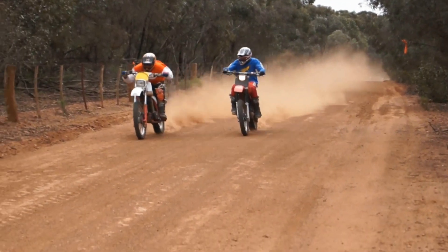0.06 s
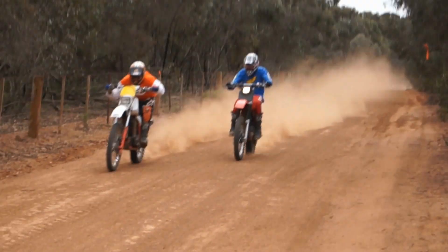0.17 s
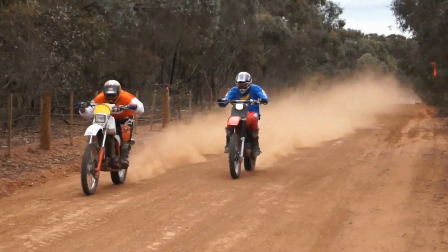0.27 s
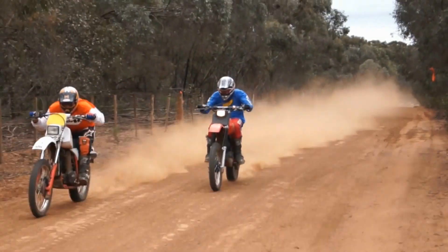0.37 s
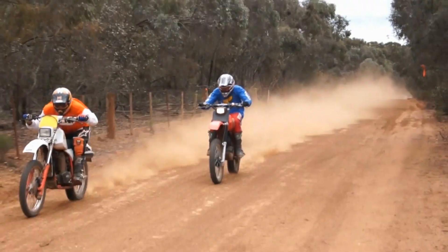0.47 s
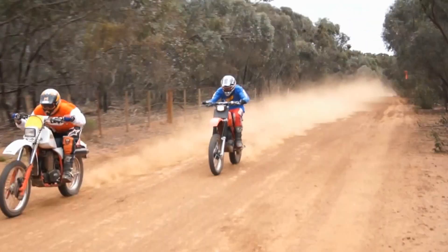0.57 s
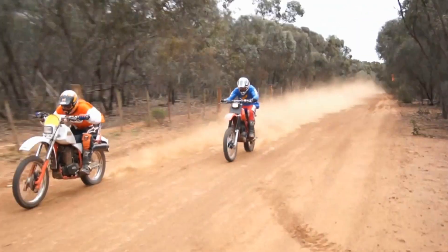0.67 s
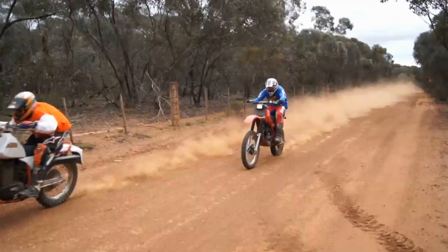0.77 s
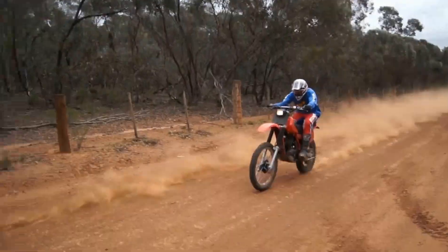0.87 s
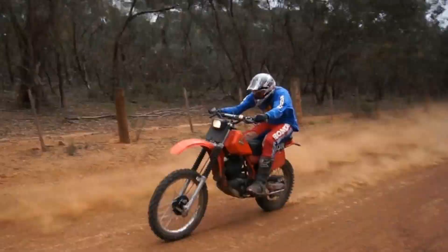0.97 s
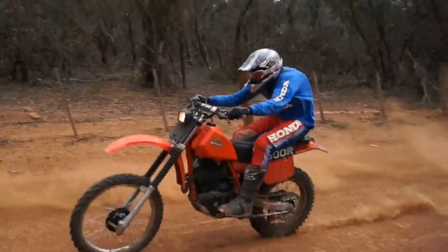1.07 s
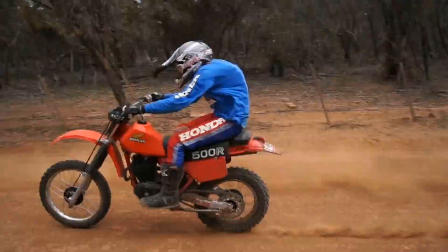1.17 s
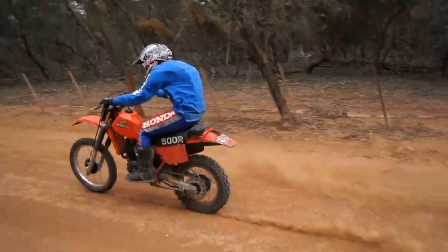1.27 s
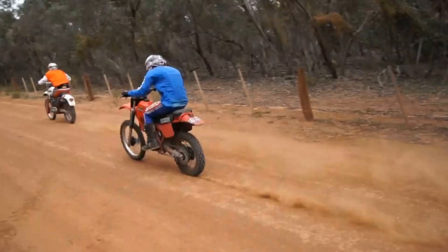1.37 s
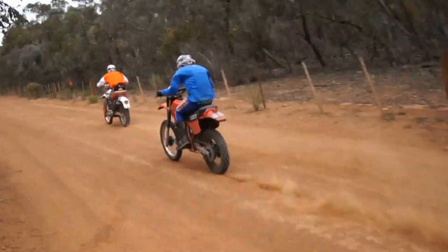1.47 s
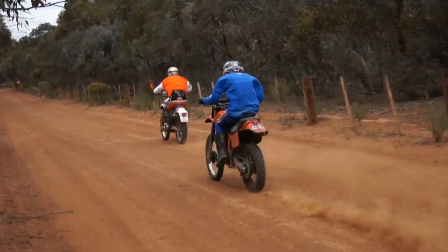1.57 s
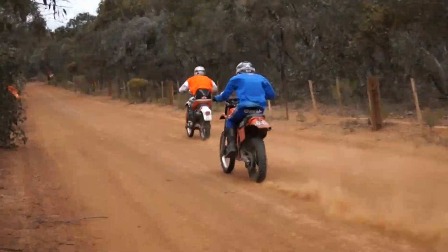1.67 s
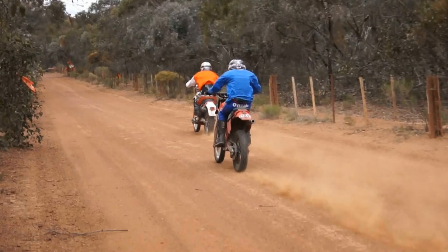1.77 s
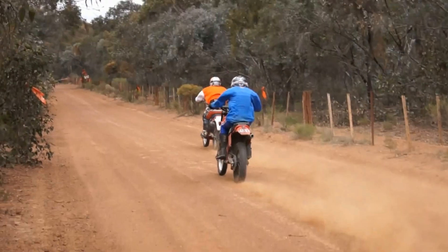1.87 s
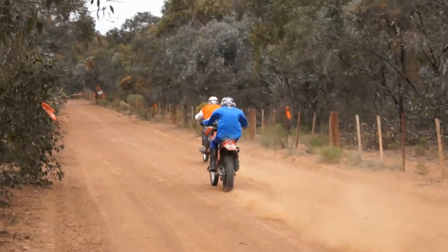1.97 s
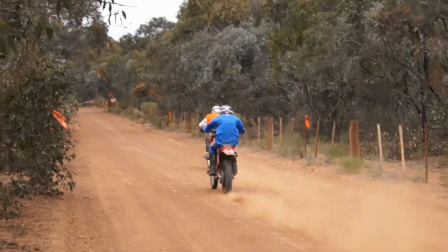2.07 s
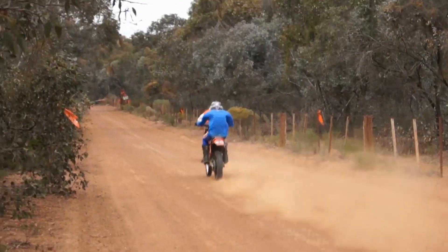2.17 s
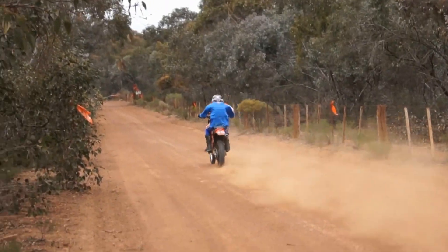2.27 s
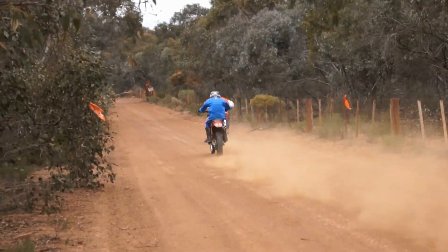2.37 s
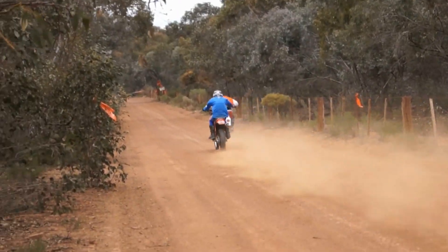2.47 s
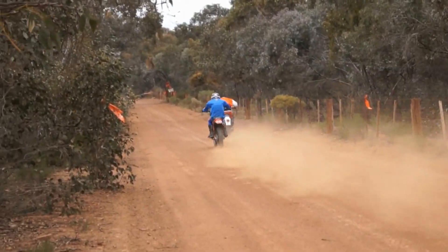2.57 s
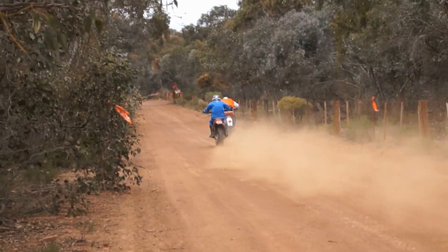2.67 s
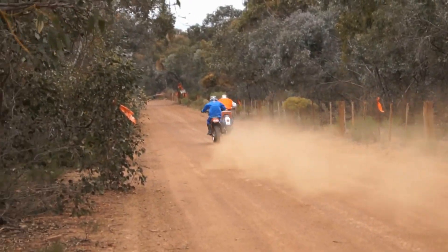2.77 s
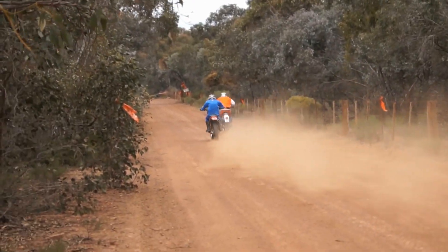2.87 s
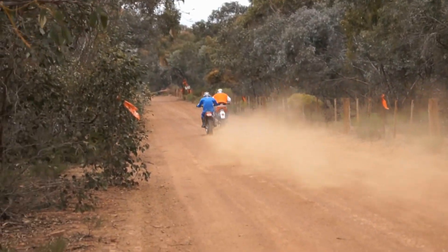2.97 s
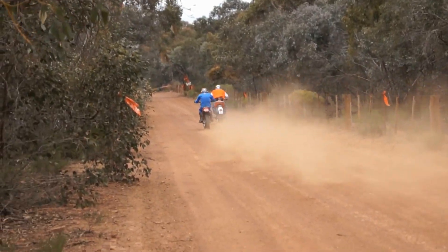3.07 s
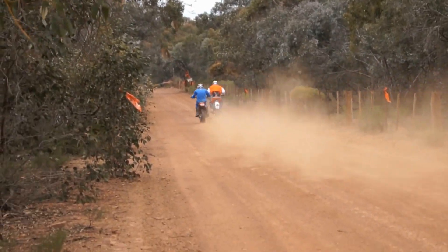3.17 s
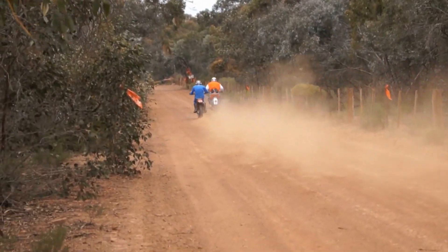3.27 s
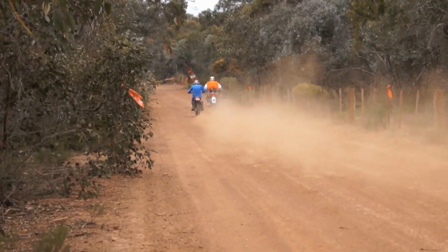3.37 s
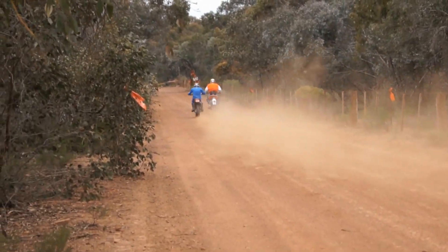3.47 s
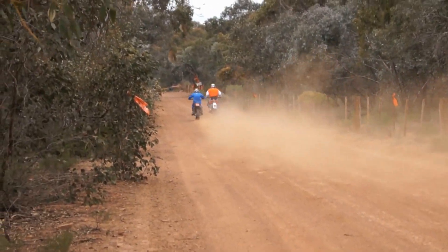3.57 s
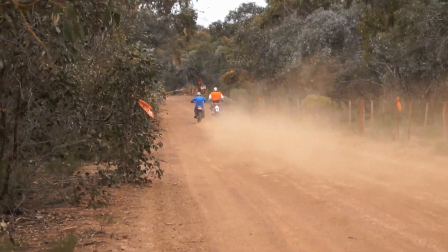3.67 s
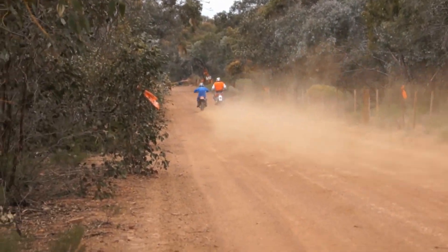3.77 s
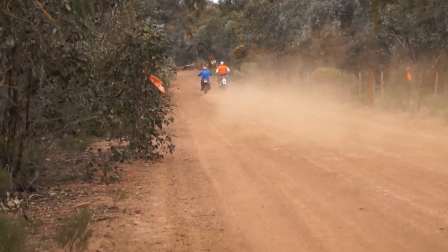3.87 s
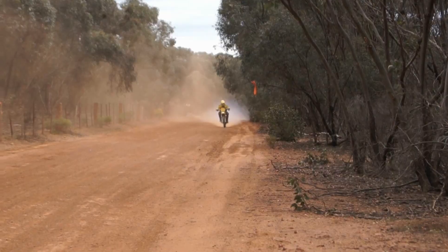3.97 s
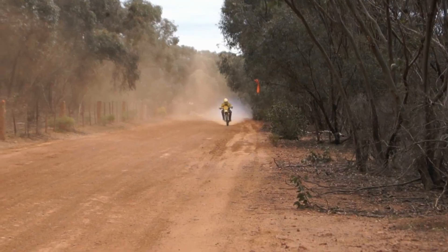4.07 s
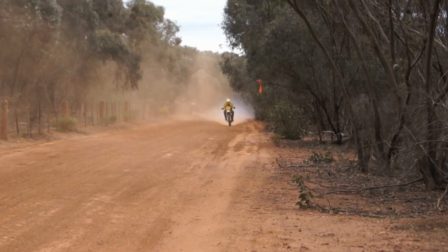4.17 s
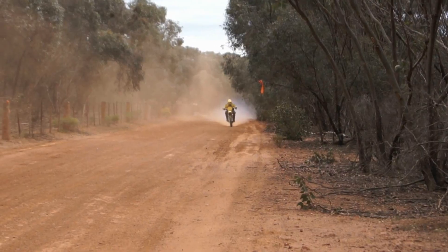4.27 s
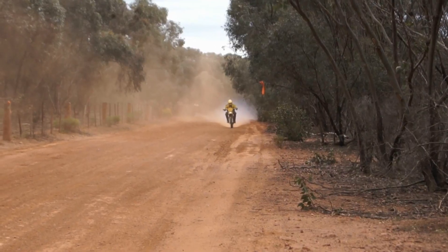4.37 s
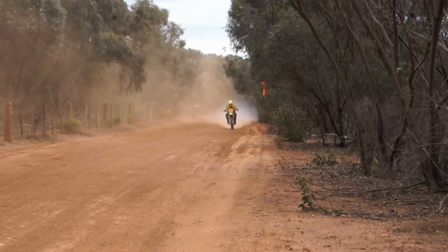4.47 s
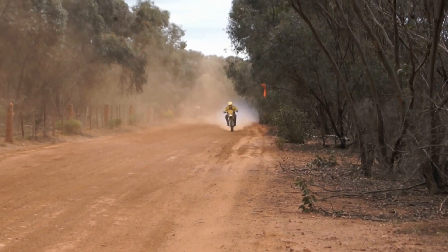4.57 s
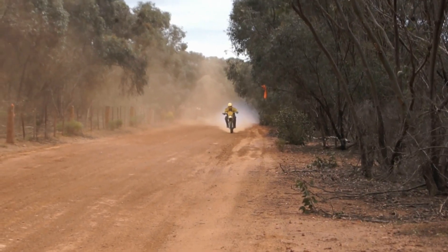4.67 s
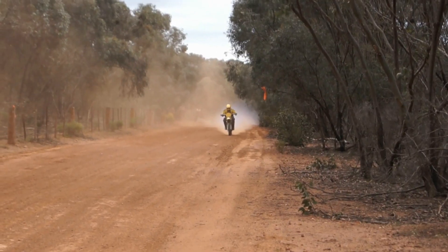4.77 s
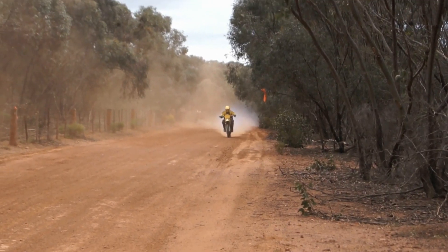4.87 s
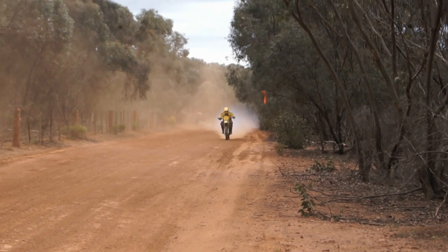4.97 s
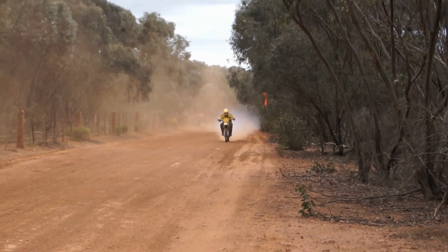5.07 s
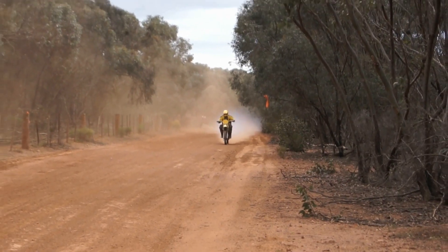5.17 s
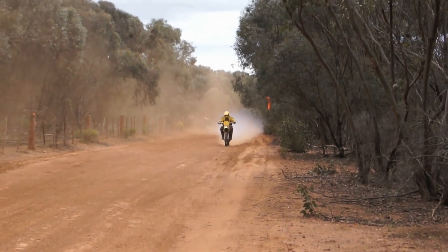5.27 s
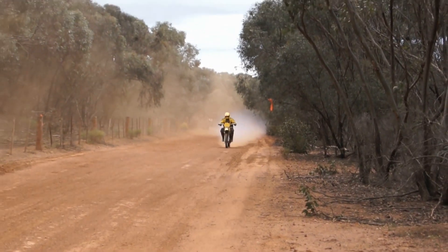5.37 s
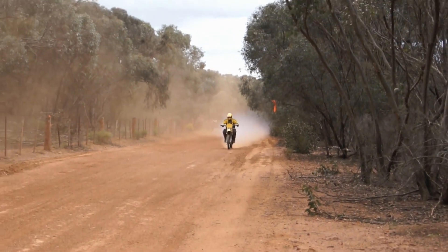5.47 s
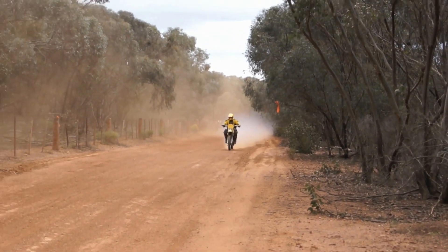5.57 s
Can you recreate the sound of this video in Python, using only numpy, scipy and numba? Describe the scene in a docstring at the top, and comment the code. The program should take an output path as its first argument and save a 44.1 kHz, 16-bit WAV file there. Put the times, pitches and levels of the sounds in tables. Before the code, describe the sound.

Outdoors on a tree-lined dirt road, two motorbikes are already close and loud, a thudding big single and a quicker buzzing one. They sweep past around one second with clattering chains and flung grit, the single changing gear, then easing off and receding. Faint stone ticks, a short dropout to silence, then a third bike comes on at high revs, its note sagging repeatedly. Roadside stereo microphone, slightly right-weighted.

```python
"""A big four-stroke motorbike thumps past on a dirt road, changes gear, rolls off the throttle and rides off between
trees, with a faster, buzzing bike just ahead of it. After a short silence a third bike comes up the road at high revs,
bogging down in ruts. Each firing is a pulse that makes resonances of the exhaust pipe ring, with a noisy jet of gas.
Shaped noise makes chains clatter, tyres hiss, grit fly and stones tick; a short, fading noise tail makes trees echo."""
import sys
import numpy as np
from scipy import signal
from scipy.fft import rfft, irfft, next_fast_len
from scipy.io import wavfile
from scipy.ndimage import uniform_filter1d
from numba import njit

SR = 44100
rng = np.random.default_rng(int(sys.argv[2]) if len(sys.argv) > 2 else 0)


def unload_audio(sound):
    """Save the sound as a 16-bit wav file, at the path given as the first command line argument."""
    columns = np.transpose(np.atleast_2d(sound))
    # keep every value between -1 and 1, then stretch to whole-number steps
    steps = np.round(np.clip(columns, -1, 1) * 32767)
    wavfile.write(sys.argv[1], SR, steps.astype(np.int16))


N = 248283
TIME = np.arange(N) / SR

# Big single: how often it fires, dropping at each gear change: time_s, firing_rate_hz
THUMPER_RATE = [(0.0, 49.3), (0.1, 50.1), (0.24, 49.4), (0.28, 42), (0.36, 39.3), (0.41, 41.2),
                (0.55, 43.16), (0.7, 43.4), (0.86, 45.12), (1.05, 45.19), (1.2, 45.35), (1.3, 44.89),
                (1.4, 42.99), (1.55, 42.64), (1.72, 42.88), (1.85, 43.21), (1.92, 39.5), (2.0, 42.08),
                (2.1, 43.71), (2.22, 43.61), (2.35, 44.72), (2.57, 44.57), (2.64, 38.6), (2.74, 38.75),
                (2.85, 39.28), (3.0, 39.14), (3.2, 38.39), (3.42, 37.28), (3.5, 35.15), (3.58, 35.47),
                (3.66, 33.73), (3.88, 33.35), (4.0, 32.8)]
# Big single: each twist of the throttle: opens_s, shuts_s, opening_time_s, throttle_0_to_1, boom_db,
# boom_slope_db_per_s, opening_surge_db, bark_over_boom_db, gas_over_boom_db
PULLS = [(-.03, 0.24, 0.024, 0.94, -23, -8.5, 1, 0.5, 6.5),
         (.34, 1.875, 0.036, 0.83, -28.5, 1.5, 5, 0.5, 3.5),
         (1.952, 2.595, 0.055, 0.81, -30, 0, 8.5, 0, 2.5),
         (2.79, 4.4, 0.14, 0.04, -26, -9, -4.5, -2, -10.5)]
# Big single: low pipe resonances under load: pitch_hz, width_hz, level_db
BOOM = [(164, 16, -4), (213, 34, 6), (262, 90, -5), (513, 61, -1.5)]
# Big single: low pipe resonances off throttle: pitch_hz, width_hz, level_db
COAST = [(184, 24, -3.5), (272, 60, 3), (331.4, 34, 0), (468, 60, -1.5)]
# Big single: silencer shell, ringing when it coasts: pitch_hz, width_hz, level_db
SHELL = [(1749, 130, -15), (1860, 120, -1)]
# Big single: a pipe resonance that sweeps down as it goes by: time_s, pitch_hz, level_db
GROWL = [(.5, 510, 10.5), (1.15, 485, 1), (1.27, 456, 10.5), (1.38, 399.8, 12.5), (1.52, 356, 0),
         (1.7, 330, 4.5), (2.05, 291, 3), (2.5, 290, -1.5)]
# Big single: two barking resonances that shift as it goes by:
# time_s, lower_pitch_hz, lower_level_db, upper_pitch_hz, upper_level_db
BARK = [(0, 737, 5, 950, -16.5), (.5, 700, 7, 1010, -3.5), (.7, 720, 3.5, 957.5, -0.5),
        (.88, 794, 0, 950, -2.5), (1.06, 830.4, -1.5, 931, 4), (1.19, 767, 7.5, 910, 2),
        (1.29, 770, -2, 974, 5), (1.4, 754, -4, 1020, 3), (1.58, 808.5, 3.5, 980, -3),
        (1.72, 760, 2, 960, 3), (1.83, 751, -11.5, 910, 5), (2.0, 699.3, 4, 940, -5),
        (2.5, 714, 5.5, 810.3, -3), (3.0, 688, 2, 849, -4.5), (3.9, 659, 0.5, 782, -8.5)]
# Big single: tone colour of the gas jet: pitch_hz, level_db
GAS = [(700, -21.5), (1200, -0.5), (1900, 1.5), (3000, 0.5), (4300, -4), (7000, -15.5), (10000, -22),
       (15000, -37)]
# Leading bike: revs and loudness: time_s, firing_rate_hz, level_db
LEADER = [(0, 56.96, -20.5), (.33, 58.16, -20), (.55, 59.1, -21.5), (.75, 59.9, -24), (.9, 60.1, -25.5),
          (1.02, 59.56, -29.5), (1.2, 55.54, -31), (1.85, 54.78, -29), (2.2, 56.8, -37.5),
          (2.6, 53.85, -51.5), (3.5, 50.2, -47)]
# Leading bike: lower pipe resonances: pitch_hz, width_hz, level_db
LEADER_LOW = [(165, 27, -24.5), (241.4, 18, 1), (289.4, 35, -2), (360.5, 16, 0.5), (526, 62, 3),
              (743, 104, 0)]
# Leading bike: upper pipe resonances, before the tuning below: pitch_hz, width_hz, level_db
LEADER_HIGH = [(793, 100, -9.5), (947, 110, 0), (1050, 110, 0)]
# Leading bike: what the upper pitches are multiplied by: time_s, pitch_ratio
LEADER_TUNING = [(0, 0.81), (.75, 0.87), (.92, 1), (1.06, 0.91), (1.25, 0.78)]
# Third bike: ruts that load the back wheel and pull the revs down: time_s, sag_hz, spread_s
RUTS = [(4.341, 5.1, 0.057), (4.483, 6.5, 0.035), (4.639, 4.8, 0.054), (4.81, 5.55, 0.028),
        (4.917, 3.08, 0.0286), (5.003, 3.8, 0.027), (5.106, 2.69, 0.0216), (5.212, 2.48, 0.028),
        (5.31, 1.63, 0.027)]
# Third bike: lower pipe resonances: pitch_hz, width_hz, level_db
THIRD_LOW = [(158, 22, -13), (206, 16, -21), (288, 75, -5.5), (381, 70, -4.5), (490, 20, -9), (505, 69, 7)]
# Third bike: upper pipe resonances: pitch_hz, width_hz, level_db
THIRD_HIGH = [(686, 38, 13.2), (730, 60, 9.5), (930, 96, 1)]
# Third bike: ringing engine metal: pitch_hz, half_width_of_each_filter_hz, level_db, growth_db_per_s
THIRD_METAL = [(1900, 170, 0, 0), (2780, 110, -11, 0), (3770, 90, -2, 2.5), (3980, 160, -6, 1.5),
               (5420, 120, -9, 2.5)]
# Third bike: tone colour of the tyre hiss: pitch_hz, level_db
THIRD_HISS = [(30, -24), (70, -5.5), (100, -15.5), (170, 0), (400, 3.5), (700, 4.5), (1080, 6.5), (1400, 1),
              (3000, -0.5), (4700, -6.5), (6300, -13.5), (8000, -17.5), (10500, -38), (15000, -48)]
# Tone colour of the chains and engine metal: pitch_hz, level_db
CLATTER = [(30, -25.5), (90, -26.5), (200, 2.5), (400, -1.5), (600, 3.5), (1100, 1.5), (1500, -2.5),
           (2100, 2.5), (2600, 1), (3200, -3), (4100, -3), (5500, -11), (8000, -17), (11000, -27.5),
           (15000, -47.5)]
# Tone colour of the flying grit: pitch_hz, level_db
GRIT = [(1500, -21.5), (4000, 15.5), (7000, 6.5), (10000, -0.5), (14000, -6), (16000, -33.5)]
# Stones flung against metal far down the road: time_s, level_db
STONES = [(3.631, -46), (3.646, -48), (3.751, -46), (3.812, -39), (3.95, -47)]
# Balance, a little to the right: time_s, left_minus_right_db
LEFT_DB = [(0, -3.5), (1.1, -1), (2.2, -1.95), (3.2, -3)]
# Hollows in the microphone's response: pitch_hz, width_hz, depth_db
HOLLOWS = [(599.5, 33, -9.5), (1385, 600, -8.5), (2363, 657, -40), (3450, 790, -10.5)]
# The sound cuts out between the two passes: time_s, level_db
FADE = [(3.995, 0), (4.055, -75), (4.07, -100), (4.279, -85), (4.289, 0)]

# Big single: a weak third barking resonance rides above the upper one
BARK_WIDTH_HZ, OVERTONE_RATIO, OVERTONE_DB = 102, 1.246, -13.5
PIPE_ECHO_S, PIPE_ECHO = 0.0025, 0.26
COOL_ECHO_S, COOL_ECHO = 0.00283, 0.2  # off throttle the gas is cooler and the round trip longer
CHAMBER_HZ, CHAMBER_WIDTH_HZ = 225.3, 67  # the silencer holds this part of the boom back
RIM_HZ, RIM_WIDTH_HZ, RIM_DB = 1220, 140, -8.5  # the tailpipe's own resonance, heard from behind
GROWL_WIDTH_HZ = 70
# a resonance heard only from straight behind
DRONE_HZ, DRONE_WIDTH_HZ, DRONE_DB, DRONE_S, DRONE_RISE_S = 402, 56, 8, 1.85, 0.22
SHELL_DB = -12
CRACK_SPREAD = 1.5  # power that exaggerates the size differences between gas cracks
SHUT_S = 0.023  # the hand snaps the throttle shut
SURGE_S, SURGE_GAS_SHARE = 0.19, 0.66  # spread of the opening surge; the gas crack shares in it
IDLE_DB, IDLE_DB_PER_M, IDLE_BARK_DB, IDLE_GAS_DB = -31, 0.3, -2.5, -22  # with the throttle shut
BARK_AHEAD_DB, GAS_AHEAD_DB = 5, -7  # changes heard from the front
TURNS_AWAY_S, TURN_S = 1.23, .1  # the cracks come out once its tail shows
AIM_S, AIM_SPREAD_S, AIM_GAS_DB = 1.35, 0.16, 4  # its tailpipe sweeps past the listener

# Leading bike's upper resonances over its lower ones: base, change from the front, lift as it swings by
UPPER_DB, UPPER_AHEAD_DB, SWING_DB, SWING_S, SWING_SPREAD_S = 0.5, -8, 14.5, 0.97, 0.2
RASP_HZ, RASP_WIDTH_HZ, RASP_DB = 2120, 460, -6.5  # intake rasp, sent forwards; width of each of two filters

# Third bike: starting levels, and how fast they grow as it nears
SECOND_PASS_S = 4.06
THIRD_HZ, THIRD_DB, THIRD_DB_PER_S = 74.63, -22, 2
THIRD_UPPER_DB, THIRD_UPPER_DB_PER_S = -1.5, 2.5
BRIGHT_HZ, BRIGHT_WIDTH_HZ, BRIGHT_DB, BRIGHT_DB_PER_S = 1040, 220, -6, 8  # the bark brightens as it nears
WHINE_ORDER, WHINE_DB = 10, -1.5  # one harmonic of its firing sings out clean
FLURRY_S, FLURRY_SPREAD_S, FLURRY_HZ, FLURRY_DB = 4.745, .05, 3900, 5  # the metal rings out in one flurry
METAL_DB, HISS_DB = -23.5, -24.5
METAL_DB_PER_HZ, HISS_DB_PER_HZ = 1.15, 0.35  # rasp and hiss ease as the revs sag
THIRD_SHUTS_S, THIRD_SHUT_HZ, THIRD_SHUT_DB = 5.532, 5.73, -6.5  # its rider rolls off the throttle
THIRD_SLOWS_S, THIRD_SLOW_S = 5.55, 0.072  # and the revs run down
THIRD_TREES_DB = -10

# Chains and engine metal: level at the closest point, lift from the front, loss at each doubling of distance
CLATTER_DB, CLATTER_AHEAD_DB, CLATTER_DB_PER_DOUBLING = -27.5, 17, 5
GRIT_DB, CHAIN_DB, CLOSE_DB_PER_M = -33.5, -30.5, 1  # grit and the single's chain fade with distance
STONE_HZ, STONE_WIDTH_HZ, STONE_FALL_S = 4300, 3000, .002  # width of each of two filters

# The pair's ride along the road
SPEED_M_S, CLOSEST_M, LEADER_PASSES_S, THUMPER_PASSES_S = 11.74, 4.4, 0.92, 1.15
HIDDEN_S, HIDDEN_DB_PER_S = 3.39, 22.5  # the level sinks from here on
SCREEN_S, SCREEN_RISE_S, SCREEN_DB = 3.35, 0.27, -1  # the bushes block the direct path
SCREEN_GAS_DB, SCREEN_BARK_DB = -4.5, -0.5  # and take the cracks first
VERGE_ECHO_S, VERGE_DB = 0.00675, -18  # an echo off the verge gets round them
HEIGHTS_M2 = 2.3  # height of the engines times height of the listener
GROUND_SHARE, DULL_DB_PER_M = 0.13, 0.84
TREES_T60_S, TREES_DB, TREES_LOW_HZ = 0.6, -3.5, 590  # T60: time for the echo to fall by 60 dB
TOP_HZ = 15600


def thumper():
    """Each firing cracks out with a jet of gas, runs back down the pipe and makes it boom and bark."""
    hz, = curves(THUMPER_RATE)
    throttle, boom_db, bark_db, gas_db = effort()
    gas_db = gas_db + AIM_GAS_DB * swell(AIM_S, AIM_SPREAD_S)
    gas_db = gas_db + GAS_AHEAD_DB * (1 - ramp(TURNS_AWAY_S, TURN_S))
    screened = ramp(SCREEN_S, SCREEN_RISE_S)
    gas_db = gas_db + SCREEN_GAS_DB * screened
    bark_db = bark_db + SCREEN_BARK_DB * screened

    pulses, age, size = firings(hz, jitter_s=.00003, scatter_db=.5, limp_db=0)
    flow = unit(size ** CRACK_SPREAD * puff(age, rise_s=.0008, fall_s=.0028))
    jet = pair(side=0.73) * flow
    push = unit(pulses) + .15 * jet.mean(axis=0)
    hot_echo = PIPE_ECHO * throttle * delay(push, PIPE_ECHO_S)
    cool_echo = COOL_ECHO * (delay(push, COOL_ECHO_S) + delay(push, 2 * COOL_ECHO_S) / 2)
    push = push + hot_echo + (1 - throttle) * cool_echo

    growl_hz, growl_db = curves(GROWL)
    growl = undb(growl_db) * glide(push, growl_hz, float(GROWL_WIDTH_HZ))
    behind = ramp(DRONE_S, DRONE_RISE_S)
    drone = undb(DRONE_DB) * behind * band(push, DRONE_HZ, DRONE_WIDTH_HZ)
    driven = cut(ring(push, BOOM) + growl + drone, 205.5, "high", order=6)
    driven = unit(cut(driven, 480, "low"))
    driven = linger(driven, CHAMBER_HZ, CHAMBER_WIDTH_HZ)

    coasting = unit(cut(cut(ring(push, COAST), 161, "high", order=5), 600, "low"))
    shell = unit(cut(ring(push + .3 * jet, SHELL), 3200, "low", order=4))
    coasting = coasting + undb(SHELL_DB) * shell

    lower_hz, lower_db, upper_hz, upper_db = curves(BARK)
    modes = [(lower_hz, lower_db), (upper_hz, upper_db), (upper_hz * OVERTONE_RATIO, OVERTONE_DB)]
    bark = sum(undb(db) * glide(push, f, float(BARK_WIDTH_HZ)) for f, db in modes)
    bark = bark + undb(RIM_DB) * behind * throttle * band(push, RIM_HZ, RIM_WIDTH_HZ)
    bark = unit(cut(cut(bark, 520, "high"), 1350, "low"))

    gas = colour(jet + .3 * unit(pulses), GAS)
    boom = throttle * driven + (1 - throttle) * coasting
    return undb(boom_db) * (boom + undb(bark_db) * bark + undb(gas_db) * gas)


def effort():
    """The single idles between pulls; each pull eases in from its surge level, holds and shuts."""
    metres, ahead = road(THUMPER_PASSES_S)
    state = [0, IDLE_DB - IDLE_DB_PER_M * metres, IDLE_BARK_DB, IDLE_GAS_DB]
    for opens, shuts, open_s, throttle, db, slope_db, surge_db, bark_db, gas_db in PULLS:
        held = ramp(opens, open_s) * (1 - ramp(shuts, SHUT_S))
        surge = surge_db * swell(opens, SURGE_S)
        pull_boom_db = db + slope_db * (TIME - opens) + surge
        # gas is set relative to the boom, so take back the part of the surge it does not share
        pull_gas_db = gas_db - (1 - SURGE_GAS_SHARE) * surge
        pulling = [np.clip(throttle, 0, 1), pull_boom_db, bark_db, pull_gas_db]
        state = [old + held * (new - old) for old, new in zip(state, pulling)]
    throttle, boom_db, bark_db, gas_db = state
    return throttle, boom_db, bark_db + BARK_AHEAD_DB * ahead, gas_db


def leader():
    """A faster, rougher engine rings its pipe; the upper pipe resonances stand out as it swings by."""
    hz, db = curves(LEADER)
    _, ahead = road(LEADER_PASSES_S)
    upper_db = UPPER_DB + UPPER_AHEAD_DB * ahead + SWING_DB * swell(SWING_S, SWING_SPREAD_S)
    pulses, age, size = firings(hz, jitter_s=.00008, scatter_db=.9, limp_db=.7)
    jet = unit(pair(side=0.77) * size * puff(age, rise_s=0.0012, fall_s=0.0067))

    low = ring(unit(pulses) + .2 * jet, LEADER_LOW)
    low = unit(cut(cut(low, 143, "high", order=4), 700, "low"))

    tuning, = curves(LEADER_TUNING)
    push = unit(pulses) + .9 * jet
    high = 0
    for pitch_hz, width_hz, level_db in LEADER_HIGH:
        mode = np.array([glide(channel, pitch_hz * tuning, float(width_hz)) for channel in push])
        high = high + undb(level_db) * mode
    high = unit(cut(cut(high, 560, "high"), 1300, "low"))

    rasp = unit(band(band(jet, RASP_HZ, RASP_WIDTH_HZ), RASP_HZ, RASP_WIDTH_HZ))
    return undb(db) * (low + undb(upper_db) * high + undb(RASP_DB) * ahead * rasp)


def third_bike():
    """High revs ring a narrow-tuned pipe; the engine's metal sings in flurries over tyre hiss."""
    elapsed = np.maximum(TIME - SECOND_PASS_S, 0)
    shut = ramp(THIRD_SHUTS_S, SHUT_S)
    sag = sum(sag_hz * swell(s, spread) for s, sag_hz, spread in RUTS)
    sag = sag + THIRD_SHUT_HZ * ramp(THIRD_SLOWS_S, THIRD_SLOW_S)
    hz = THIRD_HZ - sag
    pulses, age, size = firings(hz, jitter_s=.00005, scatter_db=.75, limp_db=.7)
    jet = unit(pair(side=0.16) * size * puff(age, rise_s=0.0029, fall_s=0.021))

    low = ring(unit(pulses) + .15 * jet, THIRD_LOW)
    low = unit(cut(cut(low, 140, "high", order=4), 514, "low"))

    high = ring(unit(pulses) + .4 * jet, THIRD_HIGH)
    high = undb(-2.5) * unit(cut(cut(high, 430, "high"), 1380, "low"))
    whine = np.sin(2 * np.pi * WHINE_ORDER * np.cumsum(hz) / SR)
    high = high + undb(WHINE_DB) * (1 - shut) * whine
    bright_gain = undb(BRIGHT_DB + BRIGHT_DB_PER_S * elapsed)
    high = high + (bright_gain - 1) * band(high, BRIGHT_HZ, BRIGHT_WIDTH_HZ)

    knocks = rattle(side=0.63, grain_db=-1, grain_hz=306) + 0.13 * jet
    metal = 0
    for pitch_hz, half_width_hz, level_db, growth in THIRD_METAL:
        mode = band(band(knocks, pitch_hz, 2 * half_width_hz), pitch_hz, 2 * half_width_hz)
        metal = metal + undb(level_db + growth * elapsed + wander(16)) * mode
    flurry = swell(FLURRY_S, FLURRY_SPREAD_S)
    metal = metal + (undb(FLURRY_DB) - 1) * flurry * band(metal, FLURRY_HZ, 700)
    metal = cut(cut(unit(metal), 920, "high"), 5060, "low", order=4)

    hiss = colour(rattle(side=0.5, grain_db=1.5, grain_hz=496), THIRD_HISS)
    upper_gain = undb(THIRD_UPPER_DB + THIRD_UPPER_DB_PER_S * elapsed)
    pipe = undb(THIRD_DB + THIRD_SHUT_DB * shut) * (low + upper_gain * high)
    rasp = undb(METAL_DB - METAL_DB_PER_HZ * sag) * metal + undb(HISS_DB - HISS_DB_PER_HZ * sag) * hiss
    return undb(THIRD_DB_PER_S * elapsed) * (pipe + rasp)


def rolling():
    """Chains and engine metal clatter, mostly forwards; the tyres fling grit, loudest close by."""
    metres, ahead = road(LEADER_PASSES_S)
    doublings = np.log2(metres / CLOSEST_M)
    clatter_db = CLATTER_DB + CLATTER_AHEAD_DB * ahead - CLATTER_DB_PER_DOUBLING * doublings
    thumper_metres, _ = road(THUMPER_PASSES_S)
    close_db = -CLOSE_DB_PER_M * (thumper_metres - CLOSEST_M)
    clatter = colour(rattle(side=0.48, grain_db=2.0, grain_hz=456.6), CLATTER)
    grit = colour(rattle(side=0.33, grain_db=4.5, grain_hz=1500), GRIT)
    # the leader's clatter and the single's chain share one noise; their powers add
    clatter_gain = np.hypot(undb(clatter_db), undb(CHAIN_DB + close_db))
    return clatter_gain * clatter + undb(GRIT_DB + close_db) * grit


def stones():
    """Each stone gives a short, bright tick: filtered noise that starts at once and dies away."""
    strikes = 0
    for s, db in STONES:
        strikes = strikes + undb(db) * (TIME >= s) * np.exp(-np.abs(TIME - s) / STONE_FALL_S)
    tick = band(band(pair(side=.5), STONE_HZ, STONE_WIDTH_HZ), STONE_HZ, STONE_WIDTH_HZ)
    return strikes * unit(cut(tick, 7500, "low", order=4))


def passing():
    """The pair goes by: a bounce off the road sweeps through the clatter, distance dulls, bushes screen."""
    metres, _ = road(THUMPER_PASSES_S)
    near = rolling()
    lag_s = 2 * HEIGHTS_M2 / metres / 343  # the bounce's longer path over the speed of sound
    bounce = np.array([delay(c, lag_s) for c in near])
    x = thumper() + leader() + near + GROUND_SHARE * bounce
    x = x * undb(-HIDDEN_DB_PER_S * np.maximum(TIME - HIDDEN_S, 0))
    dull = cut(cut(x, 4600, "low", order=1), 14300, "low")
    x = dull + undb(-DULL_DB_PER_M * (metres - metres.min())) * (x - dull)
    x = x + stones()
    screened = ramp(SCREEN_S, SCREEN_RISE_S)
    verge = undb(VERGE_DB) * screened * cut(delay(x.mean(axis=0), VERGE_ECHO_S), 1140, "low")
    return undb(SCREEN_DB * screened) * x + verge + undb(TREES_DB) * trees(x)


def trees(x):
    """Trunks and bushes scatter a short, diffuse echo; the bass passes between them."""
    size = SR // 2
    t = TIME[:size]
    tail = pair(side=0.91, size=size) * undb(-60 * t / TREES_T60_S) * (1 - np.exp(-t / 0.0059))
    tail = tail / np.sqrt(np.sum(tail ** 2) / 2)
    tail = cut(cut(tail, 4200, "low", order=1), TREES_LOW_HZ, "high", order=1)
    return signal.fftconvolve(x.mean(axis=0)[None], tail, axes=1)[:, :N]


def road(passes_s):
    """A bike's distance in metres, and how far it faces the listener (1 coming, 0 going)."""
    along = SPEED_M_S * (TIME - passes_s)
    metres = np.hypot(along, CLOSEST_M)
    return metres, (1 - along / metres) / 2


def firings(hz, jitter_s, scatter_db, limp_db):
    """One pulse a cycle, uneven in time and size, with a limp of strong and weak; also the latest's age and size."""
    turns = np.cumsum(hz) / SR + .45
    cycle = np.arange(1, int(turns[-1]) + 1)
    chance = rng.standard_normal((1000, 2))[cycle]
    at = np.interp(cycle, turns, TIME) + jitter_s * chance[:, 0]
    at = np.sort(np.clip(at, 0, TIME[-1]))
    size = undb(scatter_db * chance[:, 1] + limp_db * (-1) ** cycle)
    pulses = np.bincount((at * SR).astype(int), size, N)
    latest = np.maximum(np.searchsorted(at, TIME) - 1, 0)
    return pulses, np.abs(TIME - at[latest]), size[latest]


def puff(age, rise_s, fall_s):
    """Gas flow after the exhaust valve opens: a quick rise, then a slower fall."""
    return unit((1 - np.exp(-age / rise_s)) * np.exp(-age / fall_s))


def rattle(side, grain_db, grain_hz):
    """Dense little knocks: noise whose strength wanders quickly, with slower surges."""
    surge_db = .7 * wander(25)
    return pair(side) * undb(grain_db * wander(grain_hz) + surge_db)


def pair(side, size=N, apart_hz=1300):
    """Two channels of noise: alike in the bass, partly unrelated in the treble."""
    mid, diff = rng.standard_normal((2, size))
    return mid + side * cut(diff, apart_hz, "high", order=1) * np.array([[1], [-1]])


def wander(rate):
    """Smooth random drift with rms 1, aiming at a new value `rate` times a second."""
    hold = int(SR / rate)
    steps = np.repeat(rng.standard_normal(N // hold + 1), hold)
    return unit(uniform_filter1d(steps, hold)[:N])


def band(x, hz, width):
    """One resonance, gain 1 at its centre."""
    return signal.lfilter(*signal.iirpeak(hz, hz / width, fs=SR), x)


def ring(x, modes):
    """A set of resonances side by side."""
    return sum(undb(db) * band(x, hz, width) for hz, width, db in modes)


@njit
def glide(x, hz, width):
    """A resonance whose centre moves, worked out sample by sample from two stored states."""
    y, b, low = np.empty(len(x)), 0., 0.
    for i in range(len(x)):
        g, k = np.tan(np.pi * hz[i] / SR), width / hz[i]
        v = (b + g * (x[i] - low)) / (1 + g * (g + k))
        b, low, y[i] = 2 * v - b, low + 2 * g * v, k * v
    return y


def linger(x, hz, width):
    """A chamber that holds one band back for a few milliseconds without changing its level."""
    return x - 2 * band(x, hz, width)


def delay(x, lag_s):
    """One channel, later by a fixed or moving time."""
    return np.interp(TIME - lag_s, TIME, x, left=0)


def cut(x, hz, kind, order=2):
    """Remove what lies above ("low") or below ("high") a pitch, with a Butterworth filter."""
    return signal.sosfilt(signal.butter(order, min(hz, .45 * SR), kind, fs=SR, output="sos"), x)


def colour(x, spectrum):
    """Shape the tone by pitch and level points; rms 1."""
    hz, db = np.transpose(spectrum)
    size = next_fast_len(N)
    f = np.maximum(np.fft.rfftfreq(size, 1 / SR), 1)
    gain = undb(np.interp(np.log(f), np.log(hz), db))
    return unit(irfft(rfft(x, size) * gain, size)[..., :N])


def ramp(at_s, length_s):
    """A straight rise from 0 to 1, centred on a moment."""
    return np.clip((TIME - at_s) / length_s + .5, 0, 1)


def swell(at_s, spread_s):
    """A smooth bump of height 1."""
    return np.exp(-((TIME - at_s) / spread_s) ** 2)


def curves(table):
    """Every column of a table after the first, joined by straight lines in time."""
    s, *columns = np.transpose(table)
    return [np.interp(TIME, s, c) for c in columns]


def undb(db):
    """Decibels to gain."""
    return 10 ** (np.asarray(db) / 20)


def unit(x):
    """Scale to rms 1 (rms is the average strength)."""
    return x / np.sqrt(np.mean(x ** 2))


def scene():
    """The pair passes, then the third bike approaches; all a little to the right."""
    third = third_bike()
    third = third + undb(THIRD_TREES_DB) * trees(third)
    left_db, = curves(LEFT_DB)
    balance = undb(np.array([left_db, -left_db]) / 2)
    return np.where(TIME < SECOND_PASS_S, passing(), third) * balance


def record(dry):
    """The microphone hollows out a few bands; the sound drops out between the passes; the top is cut."""
    for hz, width, db in HOLLOWS:
        dry = dry - (1 - undb(db)) * band(dry, hz, width)
    fade_db, = curves(FADE)
    top_cut = signal.ellip(8, .2, 70, TOP_HZ, fs=SR, output="sos")
    return signal.sosfilt(top_cut, dry * undb(fade_db))


dry = scene()
out = record(dry)
unload_audio(out)
```